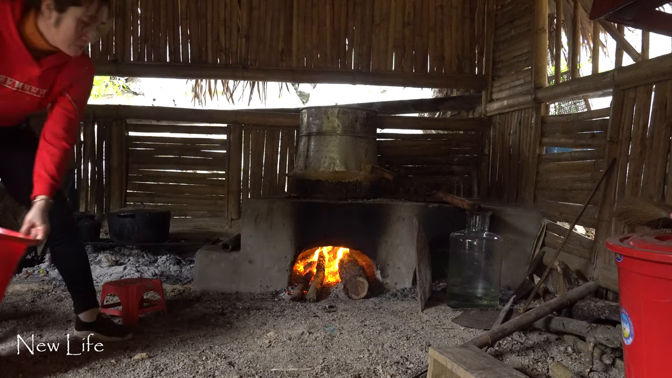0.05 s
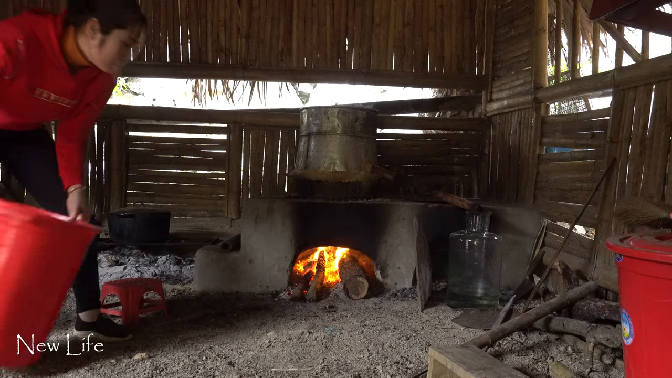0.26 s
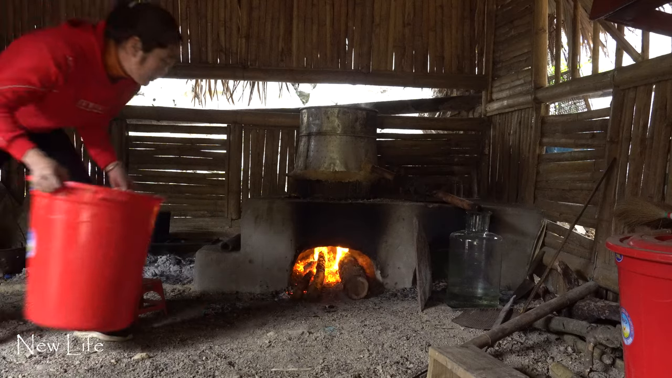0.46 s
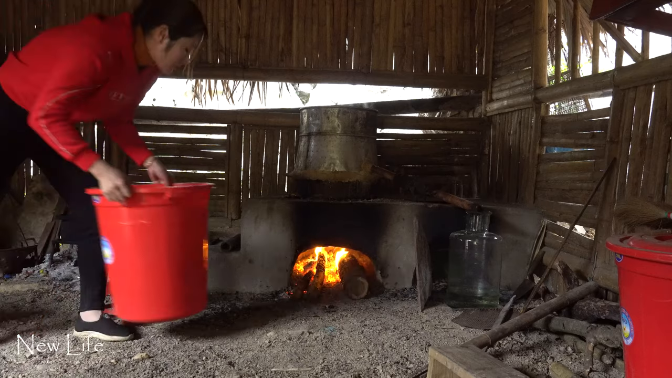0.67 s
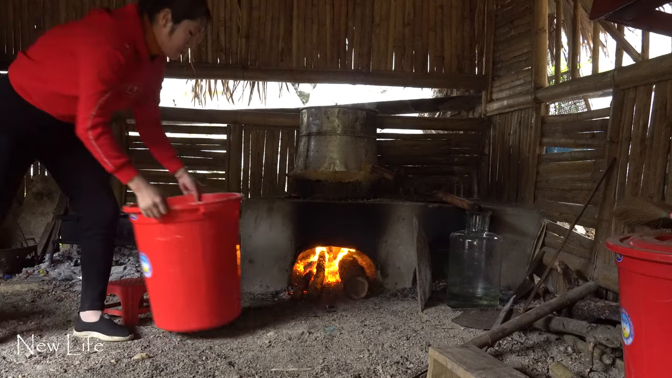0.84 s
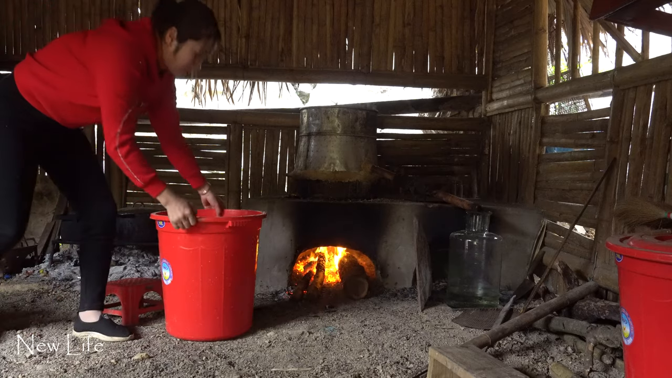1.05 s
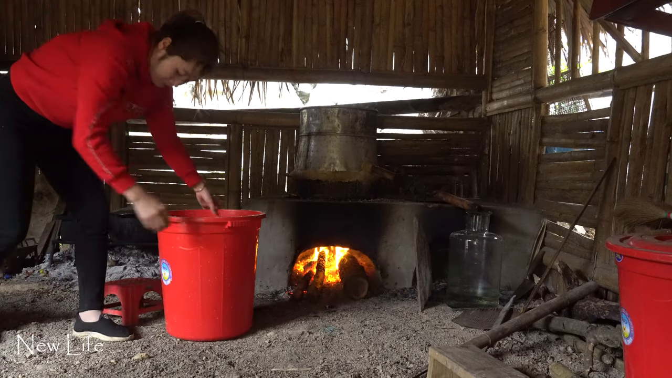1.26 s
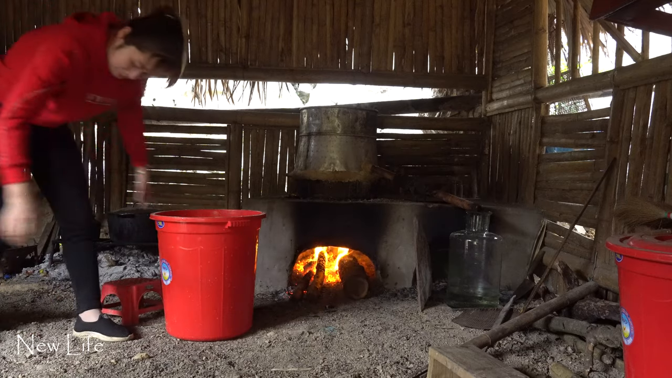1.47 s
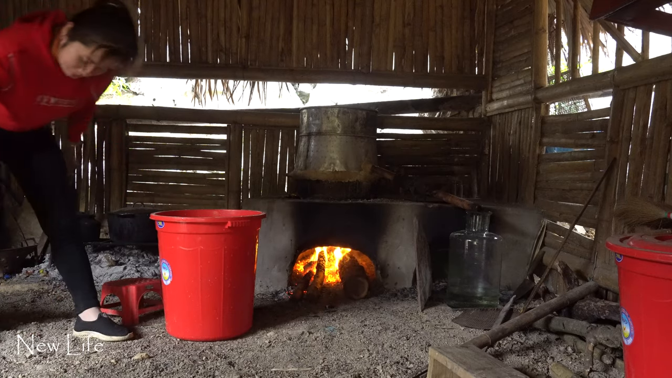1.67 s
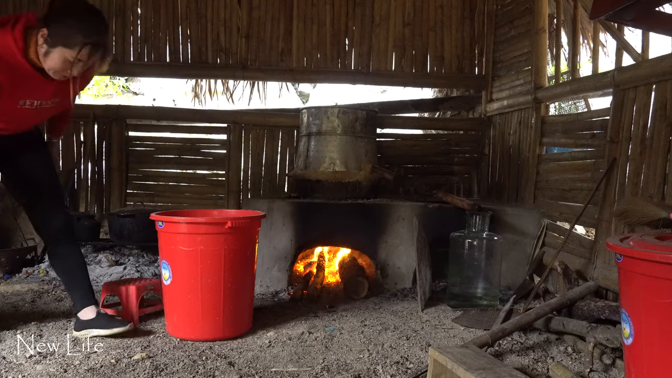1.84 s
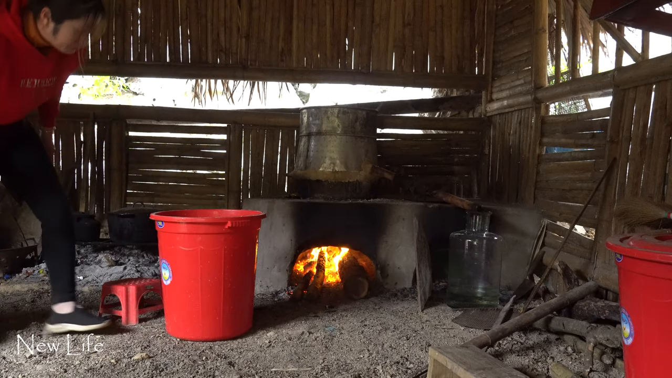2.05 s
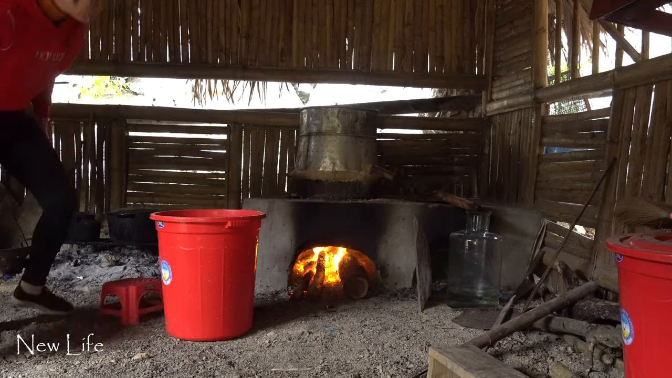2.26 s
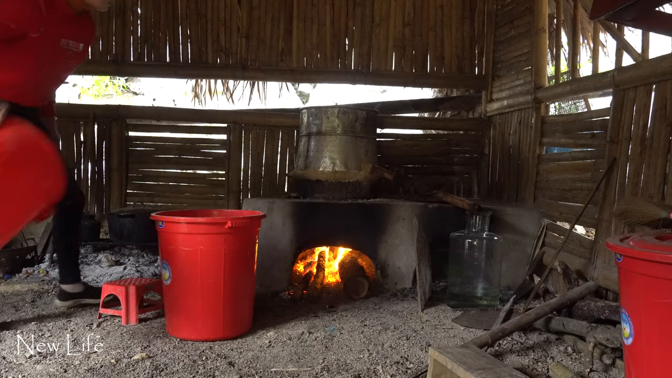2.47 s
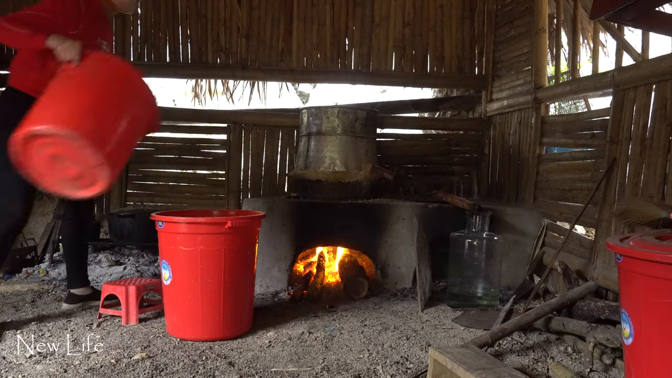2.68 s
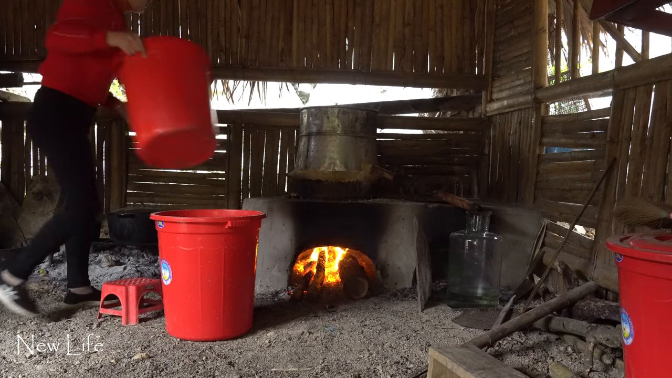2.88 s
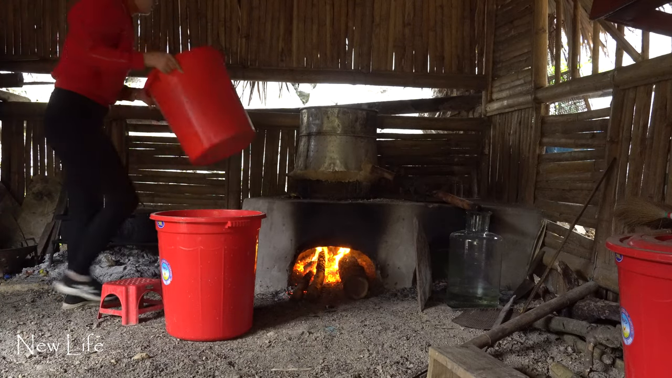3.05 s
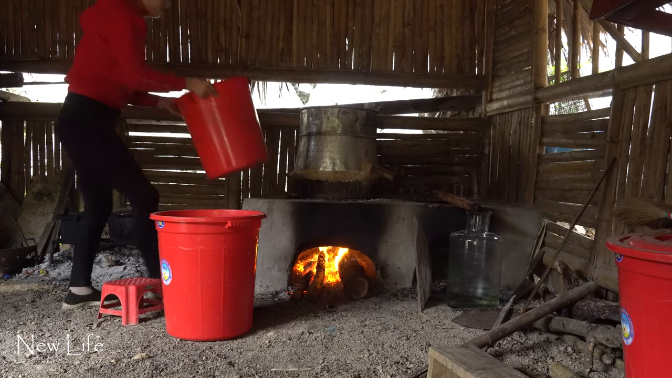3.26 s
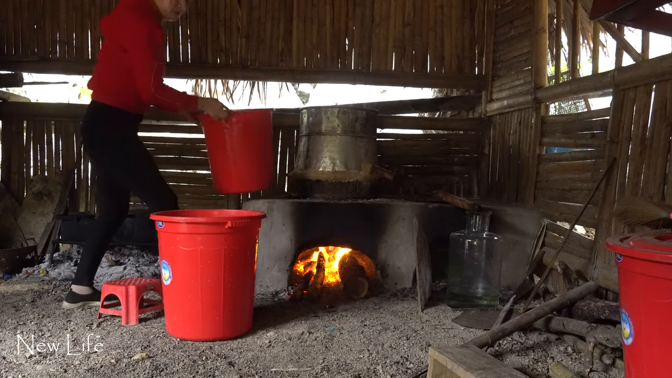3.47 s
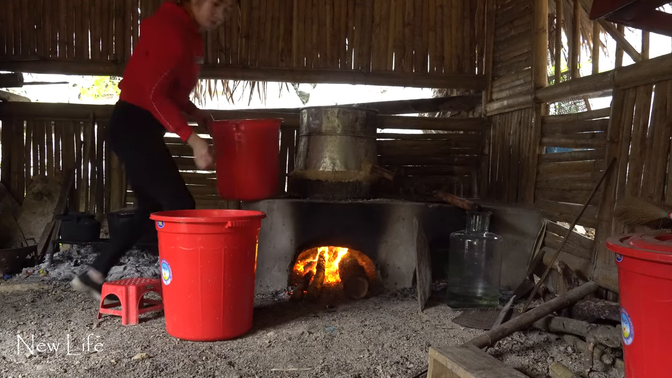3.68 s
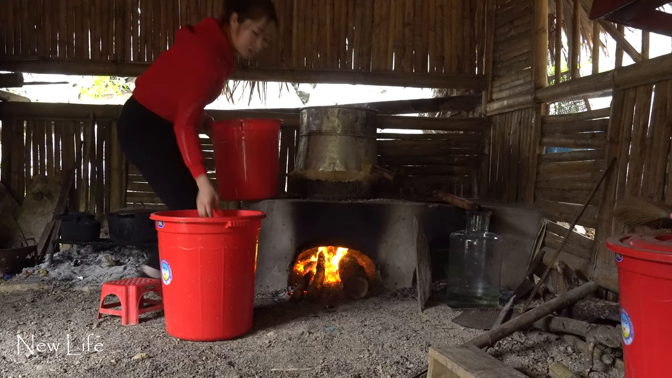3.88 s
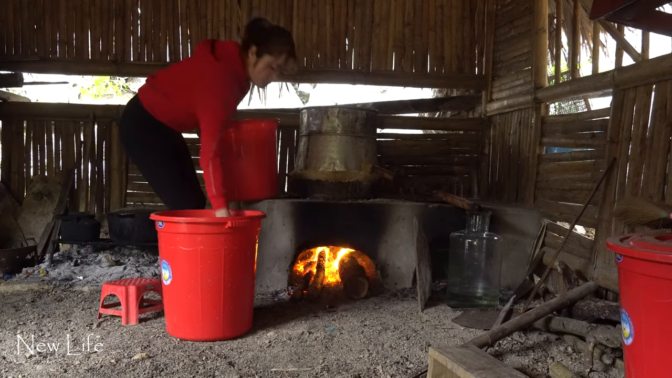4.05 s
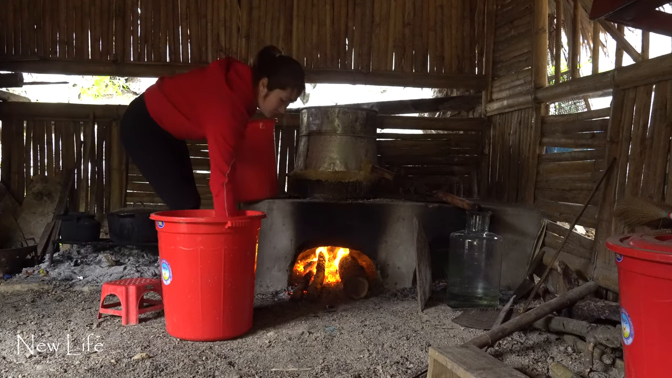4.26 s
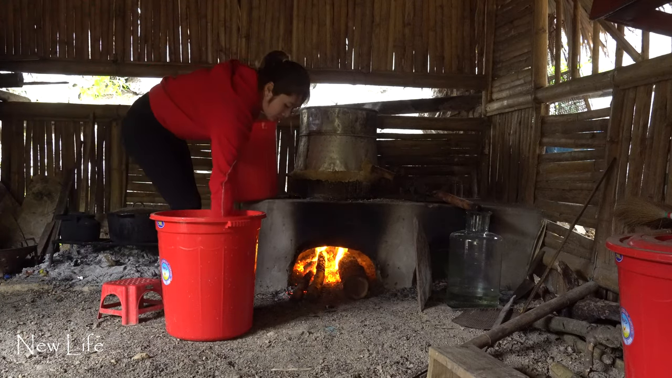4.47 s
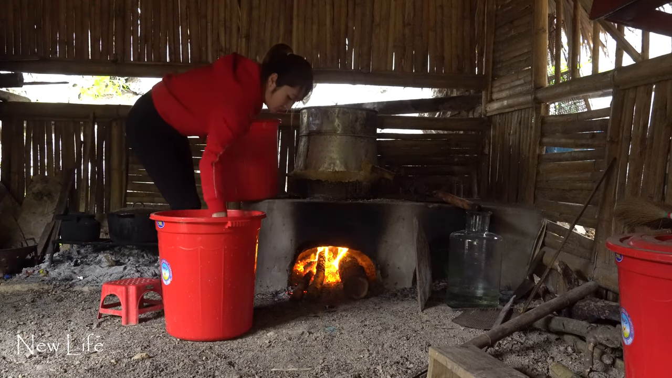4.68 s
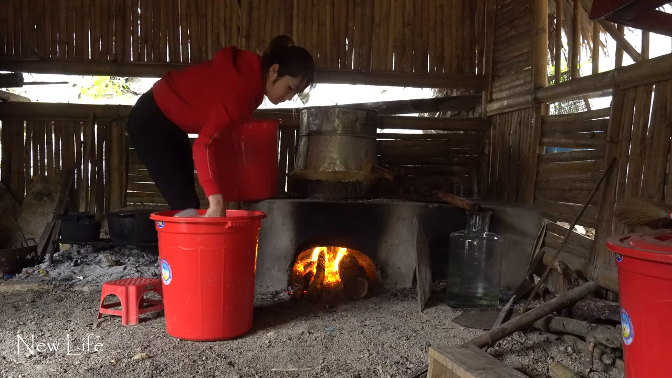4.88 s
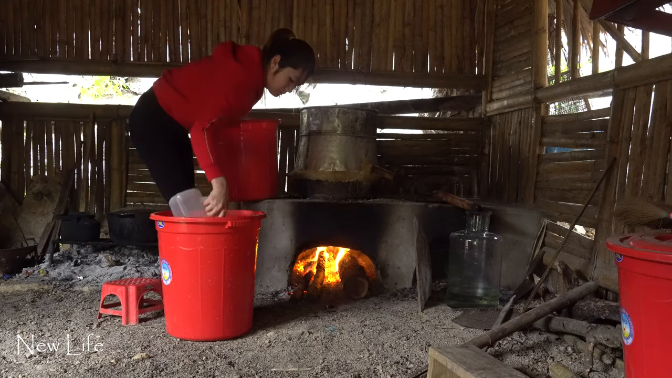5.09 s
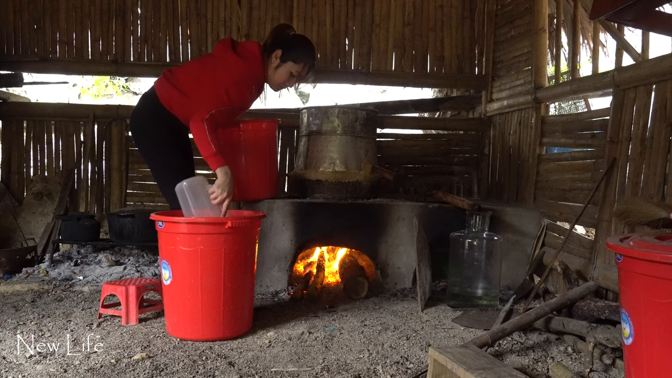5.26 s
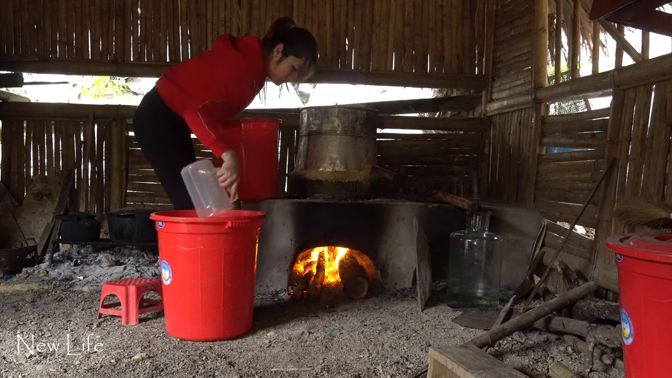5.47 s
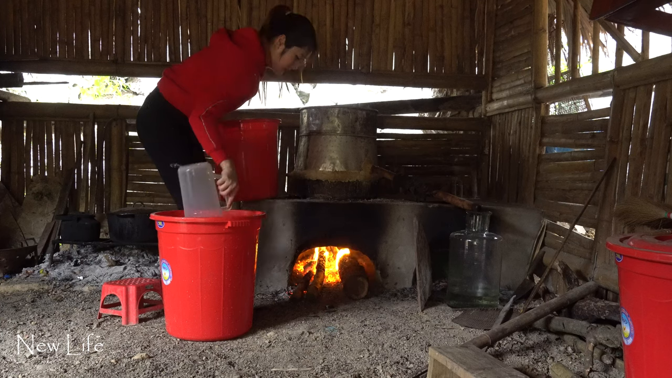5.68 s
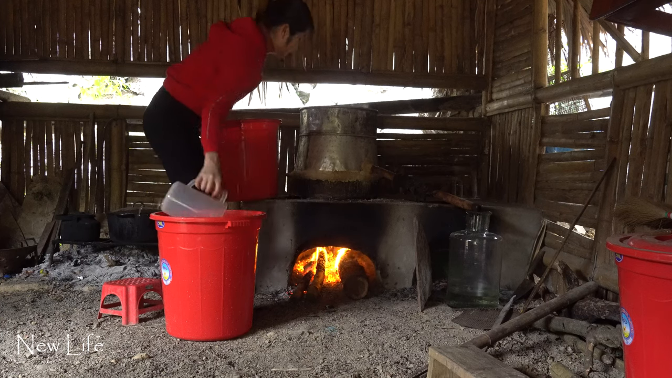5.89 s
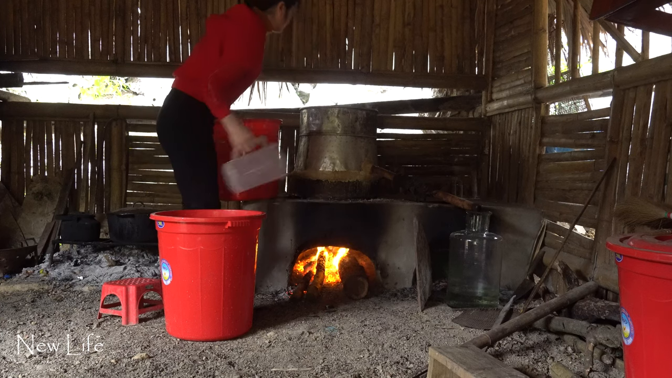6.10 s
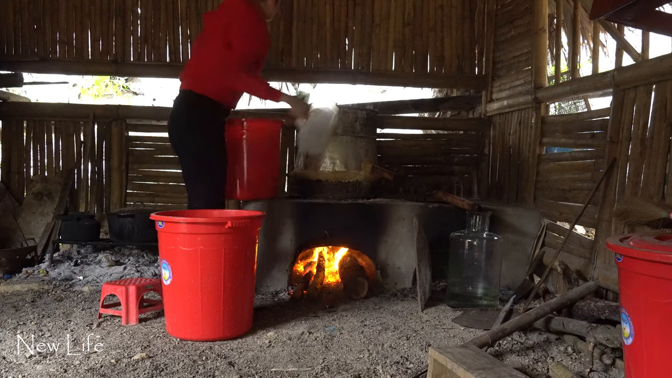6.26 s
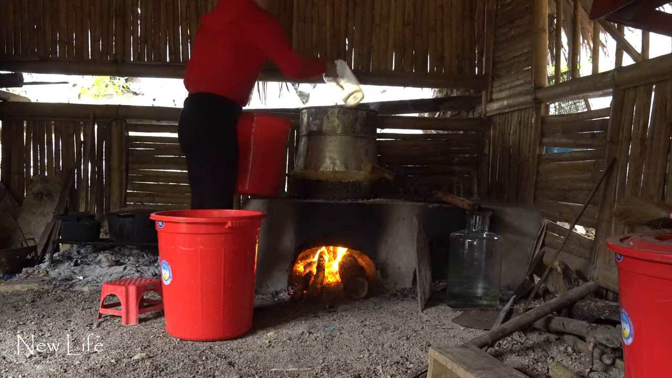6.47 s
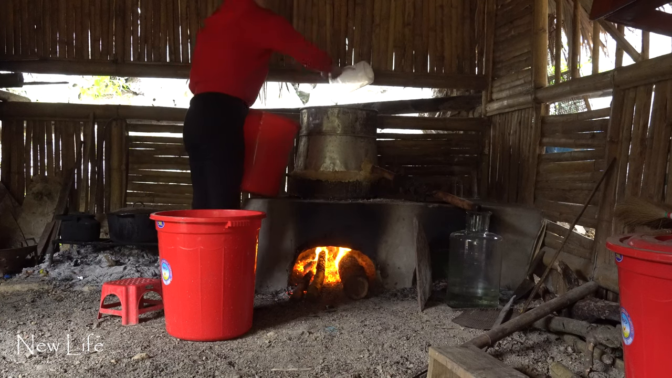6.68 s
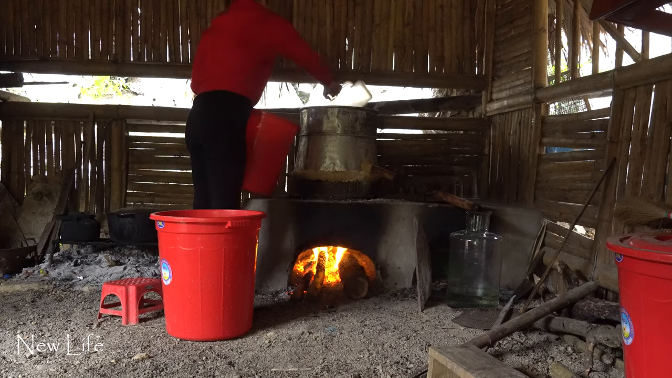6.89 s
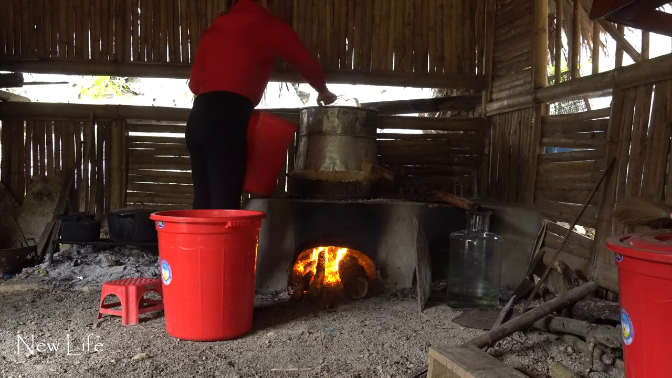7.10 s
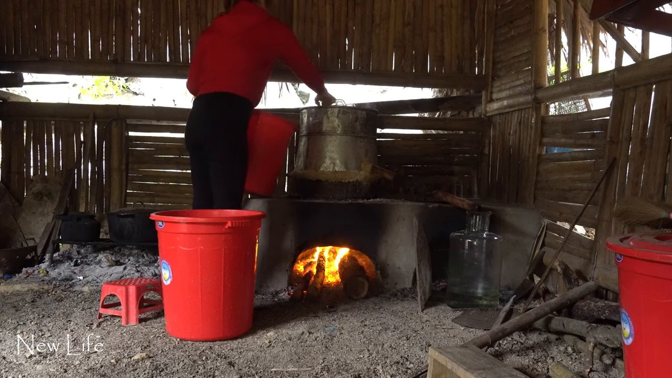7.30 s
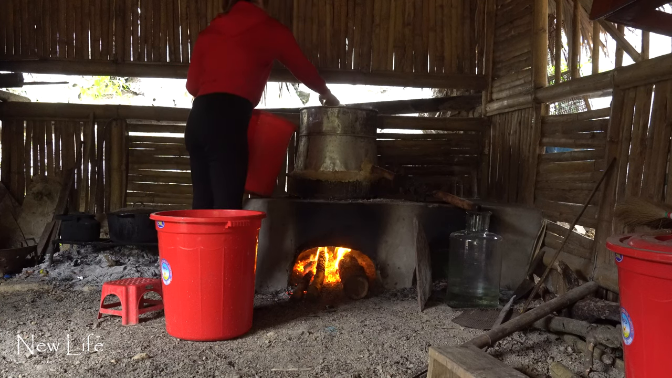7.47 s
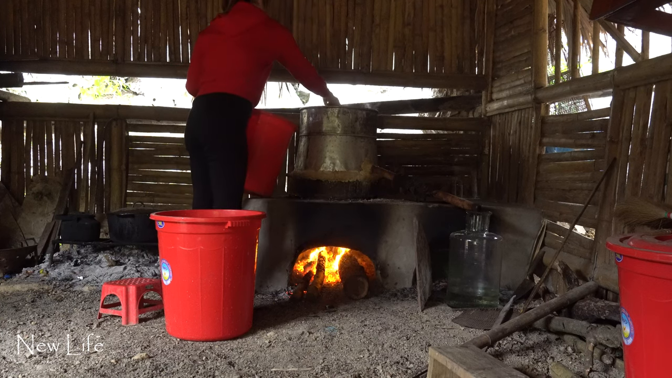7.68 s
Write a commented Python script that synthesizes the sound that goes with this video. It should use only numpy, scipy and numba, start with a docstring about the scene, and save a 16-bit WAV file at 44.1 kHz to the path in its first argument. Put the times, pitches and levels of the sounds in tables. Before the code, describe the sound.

Throughout, a wood fire hisses softly with fine crackle in a dry bamboo shed, heard by a stereo microphone a few metres away. From 0 to 0.25 s an empty plastic tub scrapes and knocks, its rim clicking sharply at 0.1; a faint airy hum accompanies its swing around 0.6. It lands with hollow double thuds at 1.06-1.13 and a lighter bump at 1.3. A stool is tapped at 1.8 and shoved with a swelling rasp until 2.03, amid scuffs and a small wood snap. Cloth swishes, another stool tap at 3.0, then a pail knocks at 3.1 and more firmly at 3.7, rattling to 4.2. From 4.5 to 5.7 a jug plunges with bright bubbles, splashes at 4.75 and 5.15, gurgles and drips. Steps and a sharp wood snap come at 6.2, a faint trickle at 6.4-6.8, light pail knocks at 6.9-7.6, and a soft thin ring at 7.5.

```python
"""A fire hisses in a bamboo shed as an empty plastic tub is dragged and set down, its rim clicks, wood snaps, shoes
scuff and a stool is shoved; then a pail is knocked about, a jug is dipped, lifted dripping and tipped in a trickle,
and the pail is knocked again. Solids are random micro-impacts or spikes filtered by resonances, water is decaying
sine bubbles and filtered spray, the fire is flickering noise with crackle; the walls add a short, dry noise echo."""
import sys
import numpy as np
from scipy import signal
from scipy.fft import rfft, irfft, next_fast_len
from scipy.io import wavfile
from scipy.ndimage import uniform_filter1d
from numba import njit

SR = 44100
rng = np.random.default_rng(int(sys.argv[2]) if len(sys.argv) > 2 else 0)


def wrap_up_sound(samples):
    """Save the sound to the file named by the first command line argument, as 16-bit audio."""
    columns = np.atleast_2d(samples).T
    # keep every value between -1 and 1, then stretch to whole-number steps
    tamed = np.clip(columns, -1, 1)
    steps = np.round(tamed * 32767).astype(np.int16)
    wavfile.write(sys.argv[1], SR, steps)


N = 341334
T = np.arange(N) / SR
SHORT = 16384  # samples in one brief sound or impulse response
TS = T[:SHORT]
TOP_HZ = 16000

# hiss of fire and yard, before the channel gains: (time [s], level [dB])
HISS_LEVEL = [(0, -51.5), (.6, -54.5), (1.3, -53.5), (2.6, -54), (3.0, -57), (3.4, -53), (4.5, -58),
              (6.2, -56), (6.55, -53.5), (7, -53.5), (7.74, -56)]
# spectrum of the fire's hiss: (frequency [Hz], level [dB])
FIRE_COLOUR = [(30, -52), (100, -20), (245, -20), (499, -5), (844, -0.5), (1720, -1), (2550, 0.5),
               (4000, -2), (6380, -3), (7200, -6), (10000, -6.5), (14800, -8.5), (16000, -12.5)]
# side against mid, in the echo and the fire: (frequency [Hz], level [dB])
SIDE_WIDTH = [(100, -28), (300, -21), (700, -10), (1400, -4), (2800, -.5), (6000, 0), (16000, 0)]
# hard crack of rim, foot or ember: (frequency [Hz], level [dB])
CRACK_COLOUR = [(800, -42.5), (2500, 11.5), (4000, 10.5), (6500, 3.5), (10000, 4.5), (16000, -7.5)]
# grit under shoes, also cloth: (frequency [Hz], level [dB])
GRIT_COLOUR = [(40, -55), (130, -23), (220, -4), (360, -2.5), (700, -1), (2000, -7), (5000, -9),
               (10000, -10.5), (16000, -11)]
# plastic walls apart from their resonances: (frequency [Hz], level [dB])
PLASTIC_COLOUR = [(100, -32.5), (300, -20.5), (500, -5.5), (800, 0), (1400, 1), (2200, -5.5), (3300, -8.5),
                  (5000, -16), (16000, -45)]
# water spray and bubbles: (frequency [Hz], level [dB])
WATER_COLOUR = [(50, -35), (120, -29), (300, -21.5), (550, -12), (900, -10.5), (1600, -3), (2500, -4),
                (4000, -1.5), (7000, -7.5), (10000, -5.5), (16000, -16)]

# the tub's scrape eases off until it is lifted: start [s], stop [s], level at stop [dB], swell and release [dB/s]
TUB_DRAG = dict(start=0, stop=0.24, db=-39, swell_db_per_s=-18.5, release_db_per_s=411)
# tub bumps: (time [s], contact [s], level before gain [dB], bottom thump and rim crack against that level [dB])
TUB_BUMPS = [(.054, 0.025, -40, -8.5, -18), (.09, 0.043, -26.5, -20, -26), (.157, 0.0075, -39, -33, -19),
             (.243, 0.037, -37.5, -32, -21), (.396, 0.0032, -42.5, -18, -10), (.605, 0.014, -55.5, 2, -18),
             (.821, 0.014, -47, -29, -21), (1.059, 0.013, -35.5, -12, -25),
             (1.067, 0.029, -27.5, -7, -19.5), (1.096, 0.013, -32.5, -7, -25),
             (1.133, 0.033, -35.5, -12, -15), (1.283, 0.046, -46.5, -36, -17)]
# wall resonances of the tub: (frequency [Hz], width [Hz], level [dB])
TUB_RESONANCES = [(217, 45, -10.5), (282, 60, -9), (339, 40, -5), (563, 28, -1), (657, 57, 2.5),
                  (768, 62, 1), (863, 52, 5), (1040, 70, 0), (1205, 50, 4.5), (1366, 70, 1),
                  (1466, 55, 2.5), (1680, 70, -9), (1860, 53, -4.5), (2610, 120, -12), (3740, 120, -16)]
# thump of the tub's bottom: (frequency [Hz], level [dB])
TUB_BOTTOM = [(30, -36), (70, -33), (120, -16), (170, -17), (212, 3.5), (290, 4.5), (400, -1.5), (900, -61)]
# firewood snaps, and the tub's rim clicking at .09 s:
# (time [s], level [dB], spectral peak [Hz], level of the echoing copy against that [dB])
SHARP_CLICKS = [(0.0908, -29, 10800, 3.5), (.304, -45, 6500, -5), (2.186, -41, 9100, 0),
                (4.452, -40, 9500, -7), (6.147, -38, 7000, -1), (6.21, -22.5, 4300, -3.5),
                (6.36, -42, 6860, 7.5)]
# shoes on grit: (middle [s], effective length [s], level [dB], centre [Hz])
SHOE_SCUFFS = [(0.218, .07, -43.5, 3540), (0.458, 0.026, -46.5, 11200), (0.909, 0.015, -43.5, 10300),
               (1.906, 0.027, -49, 9100), (1.924, 0.029, -41.5, 2580), (2.025, 0.042, -39, 3900),
               (2.161, 0.28, -54, 10060), (2.688, 0.085, -53.5, 990), (2.79, 0.035, -50.5, 1270),
               (2.855, 0.016, -50, 4900), (3.218, 0.018, -53, 5560), (3.425, 0.058, -51.5, 940),
               (3.681, 0.072, -57.5, 1310), (6, 0.038, -47, 1630), (6.077, 0.025, -45, 4880),
               (6.164, 0.065, -52.5, 1510), (6.851, 0.011, -50, 1820), (7.185, .025, -50.5, 10500),
               (7.371, 0.093, -57, 880)]
# sleeves and trousers: (middle [s], effective length [s], level before gain [dB], centre [Hz], glide [octaves/s])
CLOTH_SWISHES = [(.487, 0.028, -52.5, 2950, -3), (1.71, 0.053, -54, 4100, -4),
                 (2.105, 0.029, -52.5, 1020, -10), (2.215, 0.019, -57.5, 1400, -2),
                 (2.385, 0.067, -52, 2110, -2), (2.48, 0.037, -54, 2850, 1), (2.68, 0.087, -54, 1900, 4.5),
                 (2.85, 0.1, -56, 1400, -11), (3.2, 0.15, -57.5, 3940, 1), (3.222, 0.019, -52.5, 1900, -3),
                 (3.295, 0.04, -46.5, 1600, -10), (3.44, 0.041, -46, 2180, -4),
                 (4.323, 0.017, -52.5, 4020, 1), (7.125, .025, -55, 1496, -12),
                 (7.23, 0.012, -50.5, 1500, 8)]

# a faint hum while the tub swings through the air: its peak, the time from there to 1/e, and its level
HUM_S, HUM_LENGTH_S, HUM_DB = 0.57, 0.23, -64.5
HUM_LOW_HZ, HUM_HIGH_HZ, HUM_SAG_HZ_PER_S = 308, 463, 190

# a shoe taps the stool: (time [s], level [dB], low-pass cutoff [Hz])
STOOL_TAPS = [(1.8126, -39.5, 1500), (3.0355, -33.5, 5200)]
# a foot shoves it ever harder, then lets go: start [s], stop [s], level at stop [dB], swell and release [dB/s]
STOOL_SHOVE = dict(start=1.82, stop=2.032, db=-36.5, swell_db_per_s=113, release_db_per_s=213.5)
# resonances of the small plastic stool: (frequency [Hz], width [Hz], level [dB])
STOOL_RESONANCES = [(208, 25, 1), (310, 45, -9), (475, 80, 3), (667, 69, 6), (864, 110, 6), (1230, 110, -4),
                    (1400, 130, 1), (1890, 240, 1), (2460, 53, -6), (3800, 350, -7), (4373, 200, -11)]
# pail on stove and pot: (time [s], contact [s], level before gain [dB], thump and crack against that level [dB])
PAIL_BUMPS = [(3.126, 0.026, -44, -44, -19), (3.736, 0.021, -33.5, -21, -9), (3.8, 0.044, -51, -14, -2.5),
              (3.834, 0.054, -48.5, -28, -24), (3.913, 0.04, -46.5, -17.5, 0.5),
              (3.965, 0.053, -53.5, -12, 4), (4.086, 0.072, -51, -39, -2.5), (4.158, 0.022, -52, -30, -23),
              (6.891, 0.019, -48.5, -36, -3), (7.011, 0.018, -41, -21, -3), (7.046, 0.035, -50.5, -9, -10),
              (7.156, 0.003, -47.5, -30, -16), (7.282, 0.013, -45, -31, -1), (7.627, 0.031, -49, -37, 3.5)]
# wall resonances of the pail: (frequency [Hz], width [Hz], level [dB])
PAIL_RESONANCES = [(228, 86, -2), (526, 270, -4), (870, 140, 4.5), (1210, 71, 2), (1480, 88, -3),
                   (1850, 130, -8), (2490, 250, -1.5), (2840, 440, -2.5)]
# thump of the pail's bottom: (frequency [Hz], level [dB])
PAIL_BOTTOM = [(30, -40), (60, -23), (87, 1.5), (108, -9), (145, 0), (215, -1), (400, -14), (900, -58)]

# gulps and drips: (time [s], starting pitch [Hz], level before gain [dB], ring [s])
GULPS = [(3.527, 1072, -48, 0.026), (4.525, 2420, -39.5, 0.011), (4.566, 1730, -46, 0.01),
         (4.64, 997, -43, 0.0084), (4.644, 2800, -41.5, 0.016), (4.744, 1200, -37.5, 0.0097),
         (4.743, 2440, -38, 0.015), (4.764, 1730, -42.5, 0.012), (4.824, 1780, -41.5, 0.0087),
         (4.826, 2470, -39, .014), (4.847, 1050, -46.5, 0.0187), (4.85, 273, -58, 0.019),
         (4.896, 2700, -35, 0.014), (4.923, 1800, -47, 0.018), (4.972, 1247, -38.5, 0.01),
         (5.096, 952, -46, 0.015), (5.104, 2160, -38, 0.0091), (5.143, 2585, -33, 0.011),
         (5.232, 704, -43.5, 0.01), (5.265, 520, -44.5, 0.01), (5.271, 1176, -38.5, 0.012),
         (5.323, 1740, -50, 0.018), (5.37, 2610, -41.5, 0.018), (5.463, 1028, -41.5, 0.031),
         (5.484, 2420, -37.5, 0.012), (5.623, 1060, -53, 0.015), (5.799, 6940, -41.5, 0.0093),
         (5.816, 1356, -53, 0.023), (6.424, 1500, -51, 0.015), (6.471, 1710, -50, .014),
         (6.474, 2320, -50, .012)]
# the jug gently stirs the pail: start [s], stop [s], level at stop [dB], swell and release [dB/s]
JUG_STIR = dict(start=4.5, stop=5.72, db=-55, swell_db_per_s=-2.5, release_db_per_s=80)
# the jug plunges, breaks the surface, spills back: (time [s], level before gains [dB], rise [s], fall [dB/s])
JUG_SPLASHES = [(4.749, -31.5, 0.0031, 602), (4.832, -44.5, 0.02, 150), (5.115, -37, 0.013, 170),
                (5.148, -33, 0.028, 143), (5.25, -39, 0.077, 140)]
# hollow of the jug: (frequency [Hz], width [Hz], level [dB])
JUG_RESONANCES = [(1260, 99, 8), (1900, 500, -2), (2650, 600, 2)]
# water along the jug's wall and lip: (middle [s], length [s], level before gain [dB], centre [Hz], glide [octaves/s])
JUG_RIVULETS = [(4.625, .025, -50, 5400, -12.5), (4.85, 0.044, -50, 7240, -13),
                (5.01, 0.071, -50.5, 2200, 18), (5.07, 0.02, -46.5, 5600, 1),
                (5.335, 0.088, -53.5, 7100, 9), (5.448, 0.018, -49.5, 11000, 0),
                (5.6, 0.044, -52.5, 4500, -1), (5.735, 0.028, -49.5, 4530, 9),
                (5.79, 0.071, -51, 6600, -0.5), (6.54, 0.034, -54, 2180, -1),
                (6.68, 0.042, -51.5, 2430, 19), (6.715, .035, -51.5, 1110, 7.5)]
# water pours back from the lifted jug: start [s], stop [s], level at stop [dB], swell and release [dB/s]
PAIL_CHURN = dict(start=5.23, stop=5.28, db=-48, swell_db_per_s=20, release_db_per_s=158)
# a thin stream into the pot: start [s], stop [s], level at stop [dB], swell and release [dB/s]
POT_TRICKLE = dict(start=6.4, stop=6.8, db=-65, swell_db_per_s=0, release_db_per_s=37)

RING_S, RING_HZ, RING_DB, RING_T60 = 7.499, 1140, -50.5, .8  # a thin ring near the pot; T60 in s


def amp(db):
    """Decibels to gain."""
    return 10 ** (np.asarray(db) / 20)


def unit(x):
    """Scale to rms 1."""
    return x / np.sqrt(np.mean(x ** 2) + 1e-20)


def lasting(x, seconds):
    """Scale to the energy of rms 1 held for so many seconds."""
    return x * np.sqrt(seconds * SR / (np.sum(x ** 2) + 1e-20))


def add(track, s, sound):
    """Superpose a sound on a track at a time."""
    i = max(int(s * SR), 0)
    track[i:i + len(sound)] += sound[:len(track) - i]


def causal(power):
    """Minimum phase: fold the cepstrum to get the promptest response with this power spectrum."""
    cepstrum = irfft(np.log(power))[:SHORT // 2]
    cepstrum[0] /= 2
    return irfft(np.exp(rfft(cepstrum, SHORT)))[:SHORT // 2]


def colour(x, points, modes=()):
    """Linear filtering: the powers of a broad spectrum and of resonance peaks add."""
    f = np.fft.rfftfreq(SHORT, 1 / SR) + 1
    hz, db = np.transpose(points)
    power = amp(np.interp(np.log(f), np.log(hz), db)) ** 2
    for centre, width, peak_db in modes:
        power = power + amp(peak_db) ** 2 / (1 + ((f - centre) / width * 2) ** 2) ** 2
    return signal.oaconvolve(x, causal(power))[:len(x)]


def hump(hz, slope_db):
    """Spectrum that falls by slope_db an octave on both sides of a centre."""
    octaves = np.arange(-8, 9)
    return np.transpose([hz * 2. ** octaves, -slope_db * np.abs(octaves)])


def high_pass(x, hz):
    """Second-order filter that thins out the bass."""
    return signal.sosfilt(signal.butter(2, hz, "high", fs=SR, output="sos"), x)


@njit
def sweep(x, hz, width):
    """State-variable resonator with a moving centre; width is a share of the centre."""
    y, band, low = np.empty(len(x)), 0., 0.
    for i in range(len(x)):
        g = np.tan(np.pi * hz[i] / SR)
        v = (band + g * (x[i] - low)) / (1 + g * (g + width))
        band, low, y[i] = 2 * v - band, low + 2 * g * v, width * v
    return y


def grains(size, rate, spread_db):
    """Random micro-impacts, so many a second, mostly small and a few large."""
    happens, sign, size_draw = rng.random((3, size))
    size_gain = amp(-spread_db * np.log(np.maximum(size_draw, .01)))
    return (happens < rate / SR) * np.sign(sign - .5) * size_gain


def walk(rate):
    """Slow random wander: normal draws, rate a second, smoothed by a running mean."""
    k = int(SR / rate)
    return uniform_filter1d(np.repeat(rng.standard_normal(N // k + 1), k), k)[:N]


def stroke(start, stop, db, swell_db_per_s, release_db_per_s):
    """Gain of one movement: it sets in, swells or eases evenly in dB up to its stop, then dies away."""
    attack_s = 0.01
    gain_db = db + swell_db_per_s * (np.clip(T, start, stop) - stop) - release_db_per_s * np.maximum(T - stop, 0)
    return amp(gain_db) * np.clip((T - start) / attack_s + 1, 0, 1)


def shed(x, wet_db, side_db=0, early_t60=0.039, late_t60=0.42, late_db=-17, lean=.12):
    """Reverberation: direct sound, dense early echoes off stove and slats, a faint late tail; wide in the treble."""
    fade = (amp(-60 * TS / early_t60) + amp(late_db - 60 * TS / late_t60)) * (TS > .0008)
    mid, side = (lasting(fade * rng.standard_normal(SHORT), 1 / SR) for _ in range(2))
    mid = (TS == 0) + amp(wet_db) * mid
    # dividing out the smoothed spectrum leaves the echo even in colour
    mid, side = (signal.fftconvolve(h, causal(1 / uniform_filter1d(np.abs(rfft(h)) ** 2, size=45)))
                 for h in (mid, side))
    centre = signal.oaconvolve(x, mid)[:N]
    across = signal.oaconvolve(x, colour(side, SIDE_WIDTH))[:N] * amp(side_db) / np.hypot(1, amp(-wet_db))
    # sources lean to the left, but long waves reach both sides alike
    across = across + lean * high_pass(centre, 300)
    return np.array([centre + across, centre - across])


def fire(crackle_rate=45, crackle_spread_db=5, crackle_db=-13):
    """Filtered noise: a hiss whose bands flicker and drift independently, with impulsive fine crackle."""
    centres = np.geomspace(350, 14000, 14)
    flicker_db, drift_db, swell_db = 2.6, .8, 1.0
    white, hiss = rfft(rng.standard_normal((2, next_fast_len(N)))), 0
    f = np.linspace(0, SR / 2, white.shape[1])
    for band in np.eye(len(centres)):
        band_noise = irfft(white * np.interp(f, centres, band))[:, :N]
        hiss = hiss + band_noise * amp(flicker_db * walk(22) + drift_db * walk(4))
    hiss = hiss * amp(swell_db * walk(14))
    mid = unit(colour(hiss[0], FIRE_COLOUR))
    side = colour(unit(colour(hiss[1], FIRE_COLOUR)), SIDE_WIDTH) * amp(-0.5)
    stereo = np.array([(mid + side) * amp(2.0), (mid - side) * amp(1.1)])
    crackle = unit(colour(grains(N, crackle_rate, crackle_spread_db), CRACK_COLOUR))
    level = amp(np.interp(T, *np.transpose(HISS_LEVEL)))
    return level * (stereo + amp(crackle_db) * shed(crackle, 2.8))


def rustle(rate=2500, spread_db=5.5, centre_hz=2000, slope_db=6, level_db=-64, swell_db=4):
    """Friction noise: clothes and soles make a faint, uneven run of tiny contacts throughout."""
    rub = colour(colour(grains(N, rate, spread_db), GRIT_COLOUR), hump(centre_hz, slope_db))
    return unit(rub) * amp(level_db + swell_db * walk(11))


def drag(movement, modes, rate, spread_db, crack_db, judder_db=1.9):
    """Stick-slip: a plastic foot slips on the ground in fits and shakes the walls above it."""
    slips = grains(N, rate, spread_db) * amp(judder_db * walk(110))
    walls = unit(colour(slips, PLASTIC_COLOUR, modes))
    crack = amp(crack_db) * unit(colour(slips, CRACK_COLOUR))
    return stroke(**movement) * (walls + crack)


def knocks(rows, modes, thump, gain_db, rate, spread_db, tail_db, tail_t60, rise_share, strike=4):
    """Impact excitation: a strike and contact chatter ring the wall, thump the bottom and crack the rim."""
    out = np.zeros(N)
    for s, contact, db, thump_db, crack_db in rows:
        rise = rise_share * contact
        force = np.minimum(TS / max(rise, 1e-4), 1)
        force = force * (np.exp(-(TS / contact) ** 4) + amp(tail_db - 60 * TS / tail_t60))
        # long contacts start softly
        blow = strike * np.exp(-rise / 0.00044) * (np.arange(SHORT) == int(rise * SR))
        chatter = force * grains(SHORT, rate, spread_db) + blow
        # the wall flexes, so every blow finds its resonances a little changed
        struck = np.array(modes) * (1 + rng.standard_normal((len(modes), 3)) * [.012, 0, 0])
        struck = struck + rng.standard_normal((len(modes), 3)) * [0, 0, 1.2]
        wall = amp(db) * lasting(colour(chatter, PLASTIC_COLOUR, struck), contact)
        bottom = amp(db + thump_db) * lasting(colour(chatter, thump), contact)
        rim = amp(db + crack_db) * lasting(colour(chatter, CRACK_COLOUR), contact)
        add(out, s, wall + bottom + rim)
    return out * amp(gain_db)


def clicks(slope_db=4):
    """Impulse response: the tub's rim, then snapping wood, give a spike and brief fizz, with more or less echo."""
    fizz, t60 = .15, .0055
    direct, echoing = np.zeros(N), np.zeros(N)
    for s, db, hz, echo_db in SHARP_CLICKS:
        burst = high_pass(fizz * rng.standard_normal(SHORT) * amp(-60 * TS / t60) + (TS == 0), 450)
        rung = colour(burst, hump(hz, slope_db), [(3180, 1480, 1.6), (8700, 4100, -1)])
        click = amp(db) * lasting(rung, 0.0011)
        add(direct, s, click)
        add(echoing, s, click * amp(echo_db))
    return direct + shed(echoing, 30.03, early_t60=0.19, late_t60=0.38, late_db=-29.5)


def scuffs(rate=5000, spread_db=4.5, slope_db=8, count=6, width_hz=170, resonance_db=1):
    """Granular friction: a swell of tiny grit contacts with chance resonances around its centre."""
    out = np.zeros(N)
    middle = TS[-1] / 2
    for s, length, db, hz in SHOE_SCUFFS:
        rub = grains(SHORT, rate, spread_db) * np.exp(-np.pi / 2 * ((TS - middle) / length) ** 2)
        resonances = [(hz * 2 ** octaves, width_hz, resonance_db) for octaves in rng.uniform(-0.954, 1, count)]
        rubbed = colour(colour(rub, GRIT_COLOUR), hump(hz, slope_db), resonances)
        add(out, s - middle, amp(db) * lasting(rubbed, length))
    return out


def swishes(rows, rate, spread_db, width, gain_db):
    """Moving resonance: a swell of tiny contacts heard through one band that glides with the movement."""
    out = np.zeros(N)
    since = TS - TS[-1] / 2
    for s, length, db, hz, glide in rows:
        rub = grains(SHORT, rate, spread_db) * np.exp(-np.pi / 2 * (since / length) ** 2)
        centre = np.clip(hz * 2 ** (glide * since), 300, 15000)
        banded = sweep(sweep(rub, centre, width), centre, width)
        add(out, s + since[0], amp(db) * lasting(banded, length))
    return out * amp(gain_db)


def hum(upper_db=-1.0):
    """Narrow-band noise: two blurred bands flutter as they swell and fade, the lower one sagging."""
    width = .36
    since = np.clip(T - HUM_S, -1, 1)
    centres = (HUM_LOW_HZ - HUM_SAG_HZ_PER_S * since, np.full(N, 1. * HUM_HIGH_HZ))
    low, high = (unit(sweep(sweep(rng.standard_normal(N), hz, width), hz, width)) for hz in centres)
    return amp(HUM_DB) * np.exp(-(since / HUM_LENGTH_S) ** 2) * (low + amp(upper_db) * high)


def stool(body_db=-9):
    """Modal excitation: a tap wakes only the upper resonances, brighter if hard; a shove shakes them all."""
    contact, tail_db, tail_t60 = .005, -20, .08
    upper_modes = STOOL_RESONANCES[len(STOOL_RESONANCES) // 2:]
    taps = np.zeros(N)
    for s, db, bright_hz in STOOL_TAPS:
        fade = np.exp(-(TS / contact) ** 2) + amp(tail_db - 60 * TS / tail_t60)
        force = 4 * (TS == 0) + grains(SHORT, 3000, 2) * fade
        rung = colour(force, np.add(PLASTIC_COLOUR, [0, body_db]), upper_modes)
        softened = signal.sosfilt(signal.butter(2, bright_hz, fs=SR, output="sos"), rung)
        add(taps, s, amp(db) * lasting(softened, contact))
    return taps + drag(STOOL_SHOVE, STOOL_RESONANCES, rate=2800, spread_db=4.5, crack_db=-10.5)


def bubble(hz, ring, glide):
    """Bubble resonance: trapped air swells over two cycles, rings, and rises in pitch nearing the surface."""
    t = TS[:int(3 * ring * SR)]
    tone = np.sin(2 * np.pi * hz * (t + glide * t ** 2 / ring / 2))
    return tone * np.exp(-2 * t / ring) * (1 - np.exp(-(t * hz / 2) ** 2))


def plops(stagger=0.017, follower_ring=0.0056, gain_db=-3.0, spray_slope_db=6):
    """Air entrainment: a gulp sheds one main bubble, a few short ones of near pitch and a little spray."""
    out = np.zeros(N)
    count, scatter, follower_db, glide, spray_db = 6, .18, -5, .1, -10
    for s, hz, db, ring_s in GULPS:
        gulp = np.zeros(SHORT)
        unrest = min(1, 0.0143 / ring_s) ** 2  # long-ringing drips are steady and clean
        add(gulp, 0, bubble(hz, ring_s, glide * unrest))
        for detune, late in zip(rng.standard_normal(count), rng.random(count)):
            follower = bubble(hz * np.exp(scatter * detune), follower_ring, glide)
            add(gulp, stagger * late, unrest * amp(follower_db) * follower)
        spray = rng.standard_normal(SHORT) * TS * np.exp(-2 * TS / ring_s)
        spray = colour(spray, hump(hz, spray_slope_db))
        add(out, s, amp(db) * lasting(gulp, ring_s))
        add(out, s - .004, unrest * amp(db + spray_db) * lasting(spray, ring_s))
    return out * amp(gain_db)


def swarm(movement, count, cycles, size_db, low_hz, high_hz, glide=0.061):
    """Superposed bubbles of random pitch, mostly weak, from a movement's start until the water settles."""
    out = np.zeros(N)
    settle_s = .25
    start, end = movement["start"], movement["stop"] + settle_s
    for when, pitch, size in rng.random((count, 3)):
        hz = low_hz * (high_hz / low_hz) ** np.sqrt(pitch)  # high pitches, small bubbles, are commoner
        level = amp(-size_db * np.log(size + 0.014))
        add(out, start + when * (end - start), level * lasting(bubble(hz, cycles / hz, glide), 1 / SR))
    return lasting(colour(out, WATER_COLOUR), end - start)


def slosh(spray_db=-4.0, fizz_db=-4.5):
    """Droplet impacts: splashes and gentle stirring drive uneven spray, ringing the jug, and fizzing bubbles."""
    stir = stroke(**JUG_STIR)
    for s, db, rise, fall_db_per_s in JUG_SPLASHES:
        fall = amp(db - fall_db_per_s * np.maximum(T - s, 0))
        stir = np.hypot(stir, fall * np.exp(-(np.minimum(T - s, 0) / rise) ** 2))
    spray = unit(colour(grains(N, 2400, 3.5) * amp(2 * walk(80)), WATER_COLOUR, JUG_RESONANCES))
    fizz = swarm(JUG_STIR, count=1800, cycles=18, size_db=3.2, low_hz=1400, high_hz=11000, glide=.1)
    return stir * (amp(spray_db) * spray + amp(fizz_db) * fizz)


def churn():
    """Air entrainment: falling water drives big, short-lived bubbles under, which gurgle."""
    bubbles = swarm(PAIL_CHURN, count=110, cycles=7, size_db=1.5, low_hz=300, high_hz=1150)
    return stroke(**PAIL_CHURN) * bubbles


def trickle():
    """Bubble resonance: a thin stream sheds small chirping bubbles at random moments."""
    bubbles = swarm(POT_TRICKLE, count=40, cycles=22, size_db=2.5, low_hz=1000, high_hz=3800, glide=.12)
    return stroke(**POT_TRICKLE) * bubbles


def ring():
    """Free damped vibration: one soft sine decays exponentially."""
    since = np.maximum(T - RING_S, 0)
    return amp(RING_DB - 60 * since / RING_T60) * np.sin(2 * np.pi * RING_HZ * since)


def scene():
    """Superposition: all sources sound in the same shed, each with its own share of echo."""
    tail_db, tub_t60, pail_t60 = -18, .27, .11
    tub = drag(TUB_DRAG, TUB_RESONANCES, rate=2000, spread_db=1.0, crack_db=-15) + hum()
    tub = tub + knocks(TUB_BUMPS, TUB_RESONANCES, TUB_BOTTOM, gain_db=1.0, rate=3400, spread_db=2.5,
                       tail_db=tail_db, tail_t60=tub_t60, rise_share=0.13)
    clothes = rustle() + swishes(CLOTH_SWISHES, rate=6000, spread_db=5, width=0.86, gain_db=1.5)
    pail = knocks(PAIL_BUMPS, PAIL_RESONANCES, PAIL_BOTTOM, gain_db=4.0, rate=5300, spread_db=3.0,
                  tail_db=tail_db, tail_t60=pail_t60, rise_share=0.027)
    rivulets = swishes(JUG_RIVULETS, rate=2800, spread_db=7, width=0.35, gain_db=-0.5)
    water = plops() + slosh() + rivulets + churn() + trickle()
    return (fire() + clicks()
            + shed(tub + stool(), -3.0, side_db=0.0, lean=0.22)
            + shed(scuffs() + clothes, 1.0, side_db=-1.5, lean=0.35)
            + shed(pail + ring(), -0.59, side_db=-1.0, lean=0.087)
            + shed(water, 1.64, side_db=-2.0, lean=0.049))


def record(dry):
    """Band limiting: a steep elliptic low-pass removes the extreme treble."""
    return signal.sosfilt(signal.ellip(10, .2, 70, TOP_HZ, fs=SR, output="sos"), dry)


dry = scene()
out = record(dry)
wrap_up_sound(out)
```